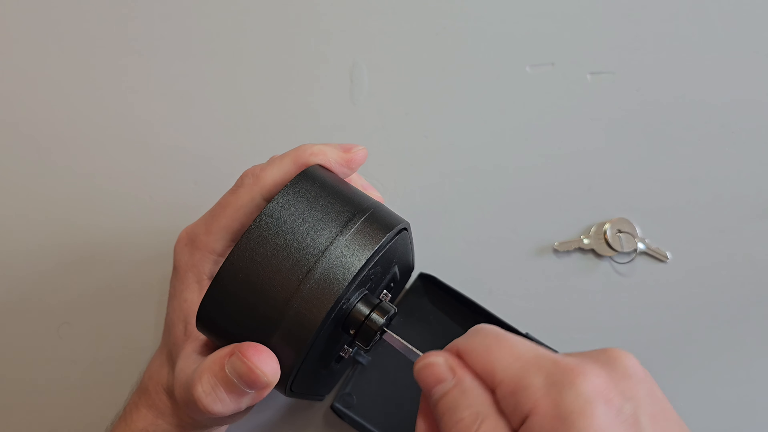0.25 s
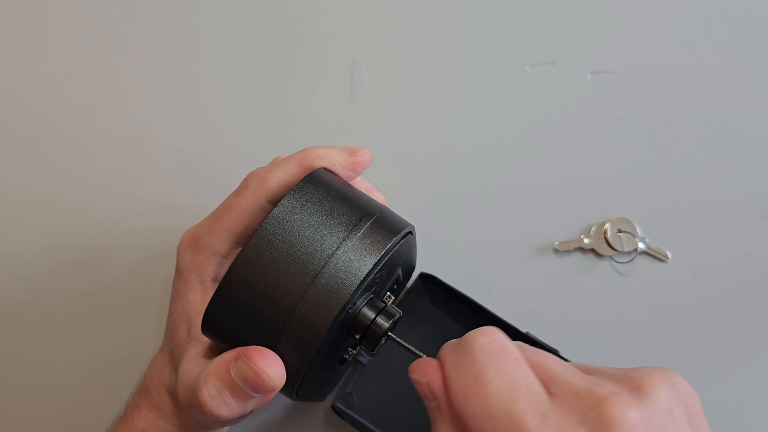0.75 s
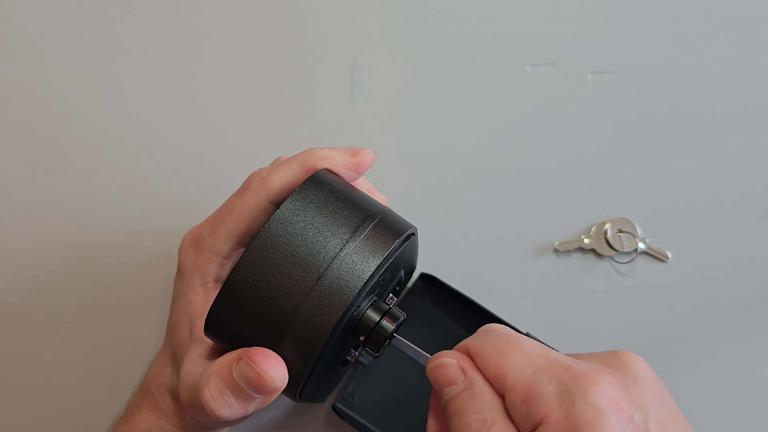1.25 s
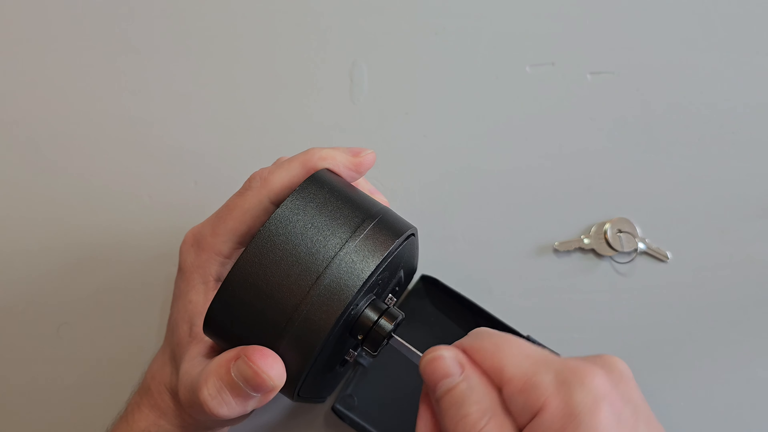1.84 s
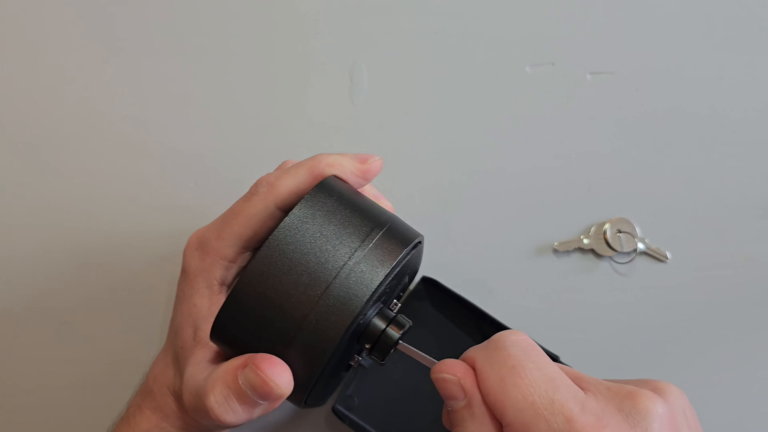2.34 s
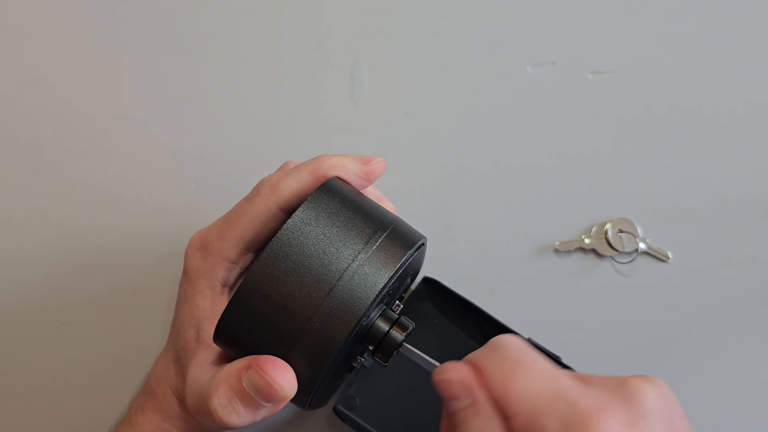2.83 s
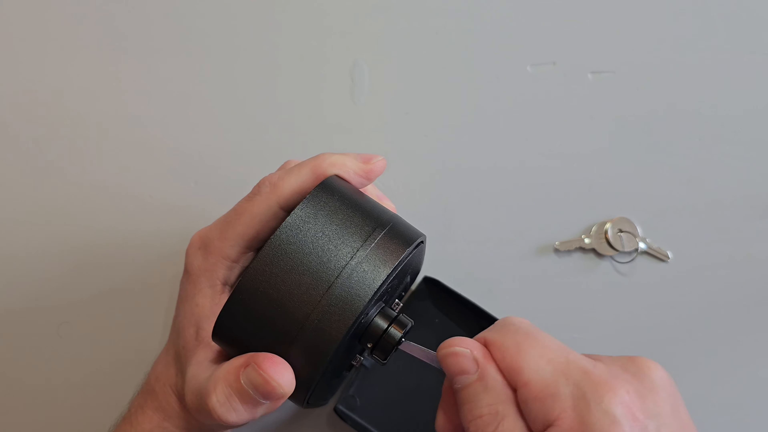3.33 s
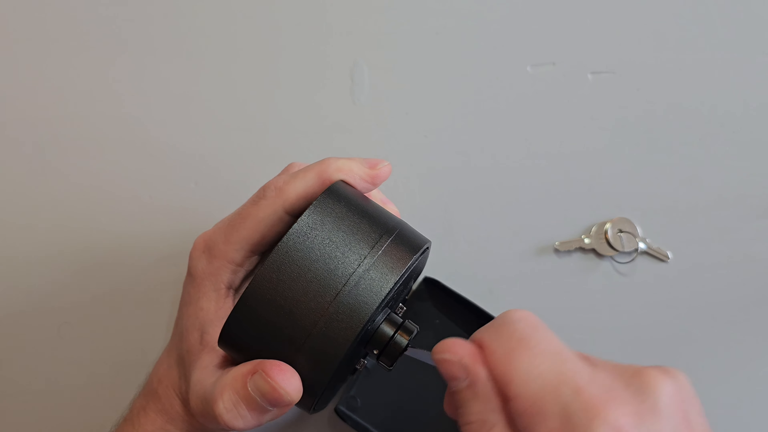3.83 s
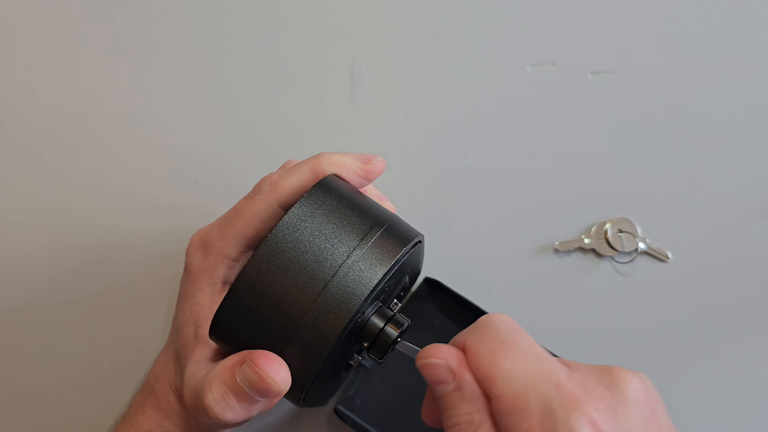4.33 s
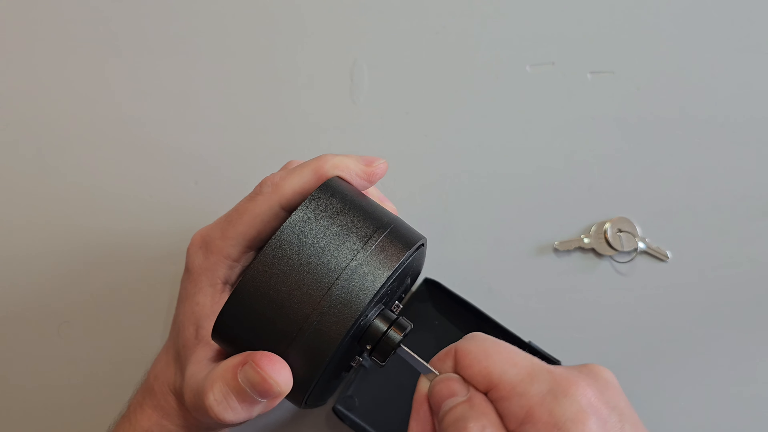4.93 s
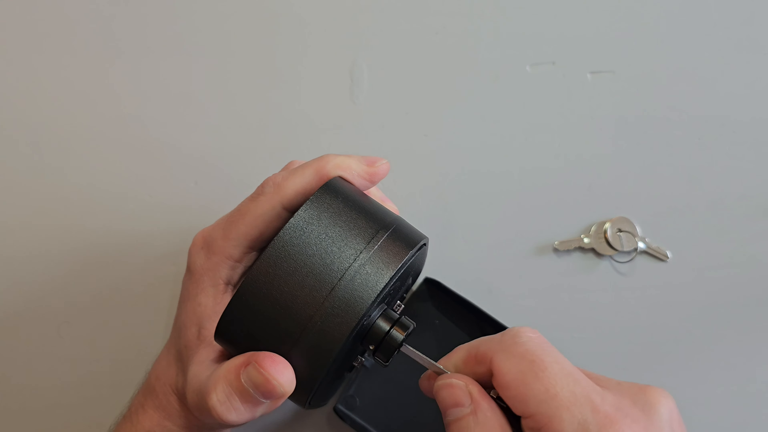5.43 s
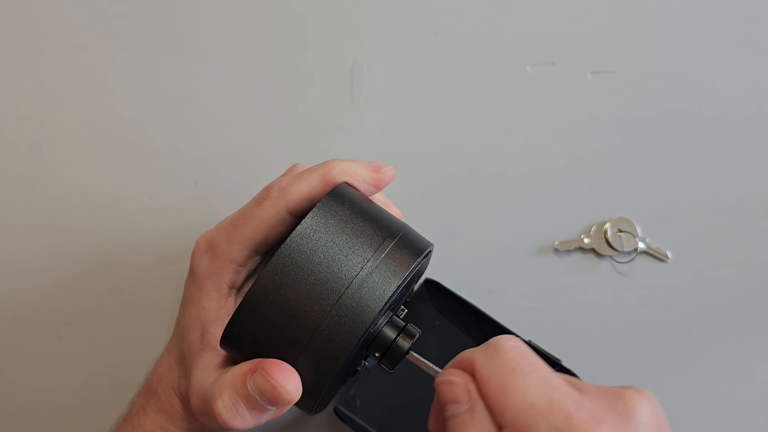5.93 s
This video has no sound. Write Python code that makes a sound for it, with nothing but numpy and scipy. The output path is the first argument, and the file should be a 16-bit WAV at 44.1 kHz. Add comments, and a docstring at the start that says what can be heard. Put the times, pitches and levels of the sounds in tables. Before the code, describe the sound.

A thin steel tool scrapes and clicks irregularly inside a small lock, with soft hollow thumps from the hand-held box and a faint room hum.

```python
"""Scrapes, sharp snaps and soft thumps: a thin steel jiggler works the lock of a small hand-held box.
The blade rubs in clumped ringing grains; each slip off a sprung wafer is a push plus stuttering noise.
Now and then the box knocks hollowly on its support, and filtered noise rumbles as the hand shifts.
Box and lock resonances colour it all; a small room adds a tail, booming low modes and a faint hum."""
import sys
import numpy as np
from scipy import signal
from scipy.fft import rfft, irfft
from scipy.io import wavfile

SR = 44100
rng = np.random.default_rng(int(sys.argv[2]) if len(sys.argv) > 2 else 0)


def transcribe(u):
    """Save the signal u as a 16-bit wav file named by the first command-line argument.

    u: samples, shape (n,) or (channels, n), limited to [-1, 1]; the rate is SR.
    q: integer samples, one column per channel.
    """
    v = np.clip(np.atleast_2d(u).T, -1, 1)
    q = np.round(v * 32767).astype(np.int16)
    wavfile.write(sys.argv[1], SR, q)


N = 272097

# blade slipping off a wafer, levels before the trims of each part: (time [s], click [dB],
# thump of the box [dB], bright tick [dB], length of the slip [s], pitch of the touched part [Hz])
WAFER_SLIPS = [(.0714, -96, -76, -53.5, 0.0038, 7800), (0.0956, -52, -76, -52, 0.0026, 2330),
               (0.1237, -48.5, -48.5, -57, .003, 2280), (0.1741, -56, -54, -51, 0.0071, 2370),
               (0.2131, -69, -49, -57, 0.0051, 2140), (.326, -62, -55.5, -102, 0.0019, 2320),
               (0.397, -47.5, -65, -45.5, 0.0045, 11600), (0.5033, -52, -55, -69, 0.0034, 2120),
               (0.5467, -44, -56, -46.5, .007, 9700), (0.5596, -60, -66, -46, .007, 9100),
               (.578, -60, -40, -54, 0.0048, 2390), (0.6, -64, -44, -47, 0.0064, 4100),
               (0.654, -37.5, -43.5, -31.5, 0.0026, 4270), (0.7339, -45, -42, -47.5, 0.0037, 2410),
               (0.7559, -53, -62, -45, 0.0055, 2170), (0.802, -64, -56, -46, 0.0034, 6840),
               (0.8444, -65, -47, -52, 0.0059, 2420), (.8938, -45, -71, -53, .005, 2860),
               (0.9227, -49.5, -54, -55, 0.0037, 2028), (0.9972, -44, -36, -92, 0.0084, 2350),
               (1.035, -76, -66, -51, 0.003, 11600), (1.1414, -59, -74, -49.5, 0.0038, 10800),
               (1.4595, -47, -56, -48.5, 0.0074, 2700), (1.4893, -63, -67, -52, 0.0011, 2380),
               (1.6363, -59.5, -48, -63.5, 0.0043, 2170), (1.7179, -48, -41, -44.5, 0.0068, 4360),
               (1.7418, -41, -41, -38.5, 0.0025, 1686), (1.821, -58, -50.5, -52.5, 0.0013, 6860),
               (1.961, -52, -48, -60, 0.0041, 2500), (2.0131, -60, -59, -45.5, 0.0045, 2300),
               (2.0238, -48.5, -45.5, -80, 0.005, 2250), (2.1695, -58.5, -49, -46.5, 0.0075, 2270),
               (2.1807, -44.5, -88, -78, .0035, 2340), (2.2523, -52, -56, -51.5, 0.0029, 2420),
               (2.349, -58, -67, -40.5, .0023, 3780), (2.3676, -42, -61, -48, 0.0027, 3760),
               (2.414, -43, -44, -68, 0.0089, 2360), (2.5147, -55, -54, -51, .01, 1740),
               (2.5241, -49, -38.5, -46.5, 0.004, 1600), (2.5486, -41.5, -38.5, -50, 0.0033, 2520),
               (2.6289, -47, -43, -38, .004, 9130), (2.6444, -49.5, -41, -64, 0.0034, 2430),
               (2.7076, -49, -46, -45, 0.0019, 2290), (2.7224, -39.5, -41, -54, 0.0025, 2380),
               (2.7764, -57, -57, -48.5, 0.0055, 12600), (2.8285, -48, -44, -62, 0.0044, 2860),
               (2.942, -55, -49.5, -56, 0.0055, 2440), (2.9725, -53, -43.5, -54, 0.0053, 2450),
               (3.0609, -46.5, -54.5, -43, .005, 9400), (3.1314, -64, -58, -60, 0.004, 8350),
               (3.2216, -49.5, -55, -54, 0.0035, 8900), (3.316, -55, -51, -62, 0.0035, 1620),
               (3.3305, -43.5, -93, -49, 0.0032, 2410), (3.3392, -38, -80, -47, 0.0033, 2640),
               (3.5786, -61.5, -61.5, -66.5, 0.0024, 2430), (3.6698, -70, -52.5, -82, 0.0021, 1640),
               (3.7314, -52.5, -56, -68, .003, 2200), (3.7855, -48, -59, -45, 0.0052, 2420),
               (3.8006, -51, -44.5, -44.5, 0.0016, 1960), (3.8404, -64, -48, -55, 0.00291, 2060),
               (3.8799, -44, -33.5, -38.5, .005, 1640), (3.9268, -40.5, -42.5, -66, 0.0017, 1640),
               (4.0161, -56, -43, -56, 0.0028, 2560), (4.0616, -44.5, -69, -55, 0.0029, 2850),
               (4.1256, -46, -45, -50.5, 0.0034, 2400), (4.2107, -47, -49, -52, 0.007, 2490),
               (4.262, -49, -53, -64, 0.0067, 2930), (4.3015, -39, -50, -44, 0.0036, 2600),
               (4.444, -47.5, -64, -67, 0.0018, 2450), (4.4725, -38.5, -49, -37, 0.0018, 6300),
               (4.564, -50, -39.5, -50, 0.0023, 2500), (4.61, -55, -54, -60, 0.0037, 7340),
               (4.655, -48, -47, -58, 0.0072, 2350), (4.6652, -37, -39.5, -32.5, 0.00305, 2510),
               (4.745, -45.5, -51.5, -54, 0.0046, 2230), (4.816, -55, -50, -69, 0.0016, 1740),
               (4.8737, -57, -67, -61, 0.0019, 1640), (4.9003, -60, -79, -53, .0013, 10800),
               (4.9817, -56, -56.5, -100, .0026, 2800), (5.2064, -42.5, -53.5, -86, 0.0022, 2500),
               (5.218, -73, -47, -49, 0.0015, 8200), (5.262, -55.5, -51.5, -76, 0.0032, 1700),
               (5.3405, -53, -55, -55, .002, 2200), (5.415, -49.5, -59, -72, 0.003, 2370),
               (5.4323, -49.5, -42, -57.5, .003, 4130), (5.4996, -67, -72, -46, 0.0029, 10900),
               (5.535, -50, -51, -56, 0.0076, 2412), (5.583, -62, -50, -49, 0.0083, 2500),
               (5.5927, -41.5, -42, -45, 0.0027, 2350), (5.6268, -52.5, -56, -34.5, 0.0013, 9800),
               (5.6513, -61, -68, -43, 0.0019, 11600), (5.7009, -42.5, -59, -40, 0.0044, 1620),
               (5.719, -50.5, -37, -53, .008, 2560), (5.847, -50, -48.5, -72, 0.0026, 3800),
               (5.9192, -56, -56, -59.5, 0.0026, 8200), (6.0167, -59, -44.5, -55.5, 0.0057, 2500),
               (6.0669, -46.5, -74, -54, 0.011, 2405), (6.0891, -48.5, -37, -53, .007, 2300)]
# strokes of the blade along the keyway, levels before trim:
# (start [s], end [s], scrape [dB], drag of the fingers on the shell [dB])
BLADE_STROKES = [(.05, 0.216, -56.5, -47.5), (0.369, 0.42, -60.5, -49.5), (0.556, 0.63, -50, -52),
                 (0.667, .9, -57, -48.5), (0.997, 1.14, -66, -58), (1.414, 1.514, -62, -52),
                 (1.721, 1.814, -62.5, -53), (1.93, 2.293, -63, -50), (2.36, 2.48, -52.5, -46),
                 (2.549, 2.915, -54, -46.5), (3.079, 3.192, -65.5, -57.5), (3.302, 3.476, -64, -50),
                 (3.768, 3.936, -63, -54.5), (4.023, 4.363, -62, -50.5), (4.45, 4.53, -60, -49),
                 (4.6, 4.838, -59, -47), (5.245, 5.26, -72, -53), (5.363, 5.446, -65.5, -48),
                 (5.573, 5.767, -52, -46.5), (5.802, 5.928, -68, -52), (5.994, 6.17, -65.5, -49.5)]
STROKE_ATTACK_S, STROKE_RELEASE_S = 0.034, 0.025


def wafer_clicks(shell_db, heavy_share):
    """The blade grates over a wafer and lets it snap; the shell sounds with it, more under a heavy thump."""
    # colour of the snaps: (frequency [Hz], level [dB])
    click_colour = [(60, -6.5), (130, -0.5), (220, 1.5), (320, -3), (430, 0), (580, -0.5), (850, -8),
                    (1150, -6.5), (1550, -2.5), (2000, -1.5), (3200, 0), (4400, -2.5), (5500, -3.5),
                    (7500, -0.5), (10500, -10), (13000, -1.5), (15500, -17)]
    ticks = faint_ticks(click_db=0.0, thump_db=1.5, tick_db=-5.5, spread_db=6.0, spread_octaves=0.47)
    rows = []
    for time, click, thump, tick, length_s, hz in WAFER_SLIPS + ticks:
        shell = click + shell_db + heavy_share * (thump - click)
        rows.append((time, thump, shell, click, tick, length_s, hz))
    snaps = contacts(rows, part_db=[20.75, 22.44, 20.4, 21.56], chatter=[.2, 1.0, 3.0, 4.0],
                     grain_db=3.5, apart=0.94, grate_db=-19.0, grate_s=0.0029, ring_db=9.0, ring_q=12.8)
    return colour(snaps, click_colour)


def faint_ticks(click_db, thump_db, tick_db, spread_db, spread_octaves):
    """Extra wafer slips at uneven times through each stroke; a harder stroke ticks louder."""
    ticks_per_s = 20
    centre_hz, centre_slip_s = 2600, 0.002615  # pitch and slip scatter around these
    rows = []
    for start, end, scrape_db, _ in BLADE_STROKES:
        lateness = rng.random(16)
        chances = np.clip(rng.standard_normal((16, 5)), -1.5, 1.5)
        for k, (late, chance) in enumerate(zip(lateness, chances)):
            time = start + (k + late) / ticks_per_s
            if time < min(end, N / SR):
                levels_db = scrape_db + np.array([click_db, thump_db, tick_db]) + spread_db * chance[:3]
                slip_s = centre_slip_s * 2 ** (chance[3] / 2)
                hz = centre_hz * 2 ** (spread_octaves * chance[4])
                rows.append((time, *levels_db, slip_s, hz))
    return rows


def contacts(table, part_db, chatter, grain_db, apart, grate_db, grate_s, ring_db, ring_q, size=4096):
    """Each contact grates, then lets go: a push plus dying tiny slips, strongest in the light parts."""
    # frequency ranges of thump, shell, lock and tick: (low [Hz], high [Hz])
    part_ranges = [(70, 260), (330, 1100), (1400, 4200), (5000, 18000)]
    lead = size // 4  # room for the grating ahead of the contact
    t = (np.arange(size) - lead) / SR
    force = np.zeros((len(part_ranges), 2, N + size))
    for time, *levels_db, length_s, hz in table:
        age = np.maximum(t, 0) / max(length_s / 2, 1e-4)
        grate = from_db(grate_db) * np.exp(-np.abs(t) / grate_s)
        stutter = np.sqrt(age) * np.exp(-age) + grate
        # small parts radiate a little differently towards each microphone
        slips = rng.standard_normal(size) + apart * rng.standard_normal((2, size))
        slips *= stutter * from_db(grain_db * rng.standard_normal(size))
        slips = rms_one(slips) / np.sqrt(size)
        push = np.arange(size) == lead + round(length_s * SR / 2)
        start = round(time * SR)
        for k, level_db in enumerate(levels_db):
            blow = (push + chatter[k] * slips) / np.hypot(1, chatter[k])
            ringing = resonate(blow, hz, hz / ring_q, ring_db)
            force[k, :, start:start + size] += from_db(level_db + part_db[k]) * ringing
    total = 0
    for k, (low, high) in enumerate(part_ranges):
        part = band(force[k, :, lead:lead + N], low, high) * np.sqrt(SR / (high - low))
        total = total + (-1) ** k * part  # neighbouring parts have opposite polarity
    return total


def rubbing(grains_per_s, grain_db, clump_db, clumps_per_s, apart, scrape_db, ring_db, ring_q, count=24):
    """Steel catches on brass in tiny clumped grains, ringing briefly at a pitch set by their spot."""
    # colour of the scrape: (frequency [Hz], level [dB])
    scrape_colour = [(100, -3), (250, -11), (500, 5.5), (700, 2), (1100, 3), (2000, 2.5), (4000, 0),
                     (8000, -7.5), (11000, -12.5), (16000, -10)]
    clump_clock = np.arange(N) / SR * clumps_per_s
    clumps = np.interp(clump_clock, np.arange(N), rng.standard_normal(N))
    sizes_db = grain_db * np.minimum(rng.exponential(1, N), 4) + clump_db * np.clip(clumps, -2, 2)
    catches = rng.random(N) < grains_per_s / SR
    kicks = rng.standard_normal(N) + apart * rng.standard_normal((2, N))
    grains = from_db(sizes_db) * catches * kicks
    # the grains of one clump come from the same spot and share its pitch
    spot = rng.integers(0, count, N)[clump_clock.astype(int)]
    grit = 0
    for k, hz in enumerate(np.geomspace(900, 10000, count)):
        grit = grit + resonate(grains * (spot == k) + 1e-18, hz, hz / ring_q, ring_db)
    rows = [(start, end, db + scrape_db) for start, end, db, _ in BLADE_STROKES]
    pressure = swells(rows, STROKE_ATTACK_S, STROKE_RELEASE_S)
    return rms_one(colour(grit, scrape_colour)) * pressure


def box_knocks():
    """The box bumps on its support: single clean blows on the hollow shell, with little stutter."""
    # bumps, levels before the trims of each part: (time [s], thump [dB], shell [dB], lock [dB],
    # tick [dB], length of the contact [s], pitch of the touched part [Hz])
    bumps = [(0.04, -44.5, -36.5, -52, -59, 0.0018, 500), (0.946, -40.5, -30.5, -41, -40, 0.0017, 419),
             (1.258, -49, -40.5, -54, -92, 0.0013, 450), (1.385, -51.5, -39, -51.5, -76, 0.0013, 460),
             (1.5066, -33, -52, -38, -74, 0.00196, 980), (1.7631, -35.5, -51, -52, -41, 0.0041, 453),
             (2.391, -34.5, -30.5, -35, -39, 0.00156, 474.4), (5.059, -39, -53.5, -42, -54, 0.0014, 460)]
    # colour of the bumps: (frequency [Hz], level [dB])
    knock_colour = [(60, -12.5), (200, -5.5), (450, 0), (780, 1), (1050, 1), (1300, -5), (2000, -2),
                    (3200, -0.5), (5000, -8.5), (8000, -9), (16000, -36)]
    blows = contacts(bumps, part_db=[23.8, 19.2, 21.5, 21.9], chatter=[.1, .3, .8, 1.2],
                     grain_db=-1.5, apart=0.26, grate_db=-10, grate_s=0.0026, ring_db=8.0, ring_q=12)
    return colour(blows, knock_colour)


def pings():
    """Parts of lock and shell ring or squeak briefly as decaying sine tones."""
    # tones: (time [s], frequency [Hz], level [dB], time to fall by 60 dB [s])
    tones = [(0.998, 2390, -29.5, 0.021), (1.507, 136, -54, 0.097), (3.223, 222, -45, 0.16),
             (3.331, 1930, -39.5, 0.096), (3.885, 471, -32, 0.026), (5.060, 690, -42, 0.13),
             (5.208, 211.6, -39.5, 0.2), (5.712, 470, -28, 0.048)]
    out = np.zeros(N)
    for time, hz, level_db, t60 in tones:
        t = np.arange(N - round(time * SR)) / SR
        decay = from_db(level_db - np.minimum(60 * t / t60, 200))
        out[-len(t):] += decay * np.sin(2 * np.pi * hz * t)
    return out


def handling(shove_db, hold_db, drag_db, give_db):
    """The box rumbles as it shifts in the hand; fingers drag on its shell and give under each thump."""
    # the box shifts in the hand: (time [s], rumble before trim [dB])
    shoves = [(.17, -58), (1.75, -43), (2.18, -60), (2.39, -40), (2.73, -45), (3.13, -69), (3.42, -53),
              (3.79, -51), (3.89, -46), (4.33, -48.5), (4.7, -50), (5.07, -55), (5.63, -42), (6.09, -50)]
    # unsteadiness of the holding hand: (time [s], rumble before trim [dB])
    hold = [(0.0, -65), (0.95, -78), (1.24, -77), (2.82, -60), (3.63, -68), (3.99, -65), (6.17, -63.5)]
    # colour of the rumble: (frequency [Hz], level [dB])
    rumble_colour = [(20, -1), (35, 3.5), (50, 1.5), (68, 5.5), (95, 1), (140, -1.5), (250, -41),
                     (1000, -49)]
    # drone of the shell under dragging fingers: (frequency [Hz], level [dB])
    grip_colour = [(60, -25), (100, -9.5), (130, -3.5), (175, 1), (225, -0.5), (300, -6.5), (450, -8),
                   (600, -11.5), (900, -25.5), (2000, -51)]
    shift_rows = [(time, time, db + shove_db) for time, db in shoves]
    shifts = swells(shift_rows, attack_s=0.025, release_s=0.033)
    unsteadiness = from_db(along(hold) + hold_db)
    rumble = rms_one(colour(rng.standard_normal(N), rumble_colour)) * np.hypot(shifts, unsteadiness)
    drag_rows = [(start, end, db + drag_db) for start, end, _, db in BLADE_STROKES]
    drag = swells(drag_rows, STROKE_ATTACK_S, STROKE_RELEASE_S)
    give_rows = [(time, time, thump + give_db) for time, _, thump, *_ in WAFER_SLIPS]
    give = swells(give_rows, attack_s=.01, release_s=0.037)
    drone = rms_one(colour(rng.standard_normal(N), grip_colour)) * np.hypot(drag, give)
    return rumble + drone


def body(x):
    """The resonances of box and lock colour every contact."""
    # resonances; a negative lift is a dip: (frequency [Hz], width [Hz], lift [dB])
    resonances = [(215.8, 21.2, 8.5), (297, 300, -3.5), (500, 86, 6), (580.3, 9.7, 3.5), (710, 35, -0.5),
                  (794, 92, 4.5), (1107, 79, 7.5), (1140, 100, -8.5), (1411, 120, 7), (1640, 70, 6),
                  (1960, 43, 7), (2350, 270, 5.5), (2644, 236, -17), (3300, 180, -0.5), (3900, 360, 0.5),
                  (4270, 180, 3.5), (5530, 250, 4), (7300, 300, 4.5), (8880, 770, 3.5), (11370, 470, 8),
                  (14700, 510, 6.5)]
    for hz, width_hz, lift_db in resonances:
        x = resonate(x, hz, width_hz, lift_db)
    return x


def room(x, build_s, alike_hz, size=26000):
    """Direct sound, earlier at the left; a tail shaped by band, alike in the bass; standing waves."""
    # reverberation; a negative time makes the band swell until the tail is cut:
    # (frequency [Hz], time to fall by 60 dB [s])
    tail_t60 = [(100, -0.8), (260, 0.36), (700, 0.18), (2000, 0.37), (5000, 0.07), (14000, 0.31)]
    # level of the tail: (frequency [Hz], level [dB])
    tail_db = [(100, -21.5), (300, -3.5), (550, -6), (850, -4), (1200, -5), (2000, -4), (5000, -5),
               (8500, -9), (12000, 3), (16000, -27)]
    # standing waves: (frequency [Hz], level [dB], time to fall by 60 dB [s])
    standing_waves = [(60.5, -80, 0.39), (128.1, -54, 0.35), (158.6, -53.5, 0.23), (222, -57.5, 0.26),
                      (358.8, -55, .3), (470, -56.5, 0.13), (519.3, -61, 0.12), (586, -61.5, 0.28),
                      (656.6, -63.5, 0.28), (821.5, -62.5, 0.46)]
    left_lag_s = -0.00012
    t = np.arange(size) / SR
    edges = np.geomspace(60, 17000, 15)
    response = np.zeros((2, size))
    for low, high in zip(edges, edges[1:]):
        hz = np.sqrt(low * high)
        alike = 1 / (1 + (hz / alike_hz) ** 2)
        mid, side = band(rng.standard_normal((2, size)), low, high)
        tail = np.sqrt(1 + alike) * mid + np.sqrt(1 - alike) * side * [[1], [-1]]
        tail *= from_db(-60 * t / at_hz(tail_t60, hz)) * (1 - np.exp(-(t / build_s) ** 2))
        # even out the energy of the bands before their levels apply
        even = np.sqrt(4 * (high - low) / SR / np.sum(tail ** 2))
        response += tail * from_db(at_hz(tail_db, hz)) * even
    for hz, level_db, t60 in standing_waves:
        response += from_db(level_db - 60 * t / t60) * np.cos(2 * np.pi * hz * t)
    # a phase slope moves the left channel about 5 samples earlier
    shift = np.exp(-2j * np.pi * np.fft.rfftfreq(2 * N, 1 / SR) * left_lag_s)
    left = irfft(rfft(x[0], 2 * N) * shift)[:N]
    return np.array([left, x[1]]) + signal.fftconvolve(response, x, axes=1)[:, :N]


def hum(level_db, apart):
    """Low steady room noise, mostly shared by both microphones."""
    # colour of the hum: (frequency [Hz], level [dB])
    hum_colour = [(20, -3), (40, 4), (130, -11.5), (230, 2), (330, -11), (550, -6), (1000, -12),
                  (2200, -34), (4000, -24.5), (10000, -39), (16000, -33)]
    mid, side = [rms_one(colour(rng.standard_normal(N), hum_colour)) for _ in range(2)]
    return from_db(level_db) * (mid + apart * side * np.array([[1], [-1]]))


def resonate(x, hz, width_hz, lift_db):
    """A resonance lifts its own narrow range and rings on; a negative lift dips it."""
    b, a = signal.iirpeak(hz, hz / width_hz, fs=SR)
    return x + (from_db(lift_db) - 1) * signal.lfilter(b, a, x)


def swell(start, end, attack_s, release_s):
    """Envelope, every 32 samples, that rises up to start, holds until end and dies away."""
    t = np.arange(0, N, 32) / SR
    return np.exp(-np.maximum(start - t, 0) / attack_s - np.maximum(t - end, 0) / release_s)


def swells(rows, attack_s, release_s):
    """Joint gain, at every sample, of rows (start [s], end [s], level [dB]), summed as power."""
    power = sum((from_db(db) * swell(start, end, attack_s, release_s)) ** 2 for start, end, db in rows)
    return np.interp(np.linspace(0, len(power) - 1, N), np.arange(len(power)), np.sqrt(power))


def along(curve):
    """Read a curve over time at every sample."""
    return np.interp(np.arange(N) / SR, *np.transpose(curve))


def colour(x, spectrum, size=8192):
    """Causal (minimum-phase) filter that follows a spectrum."""
    levels_db = at_hz(spectrum, np.fft.rfftfreq(size, 1 / SR))
    cepstrum = irfft(np.log(from_db(levels_db)))
    # folding the cepstrum forward gives minimum phase
    cepstrum[1:size // 2] *= 2
    cepstrum[size // 2 + 1:] = 0
    impulse = irfft(np.exp(rfft(cepstrum)))
    return signal.fftconvolve(np.atleast_2d(x), impulse[None], axes=1)[:, :N]


def band(x, low, high):
    """Causal band-pass."""
    return signal.sosfilt(signal.butter(2, [low, high], "band", fs=SR, output="sos"), x + 1e-18)


def at_hz(points, hz):
    """Read a table on a log-frequency axis."""
    points = np.array(points)
    return np.interp(np.log(np.maximum(hz, 1)), np.log(points[:, 0]), points[:, 1])


def rms_one(x):
    """Scale to rms 1."""
    return x / np.sqrt(np.mean(x ** 2) + 1e-20)


def from_db(db):
    """Decibels to gain."""
    return 10 ** (np.asarray(db) / 20)


def scene():
    """All contacts sound through the box into the room; the whole picture leans a little to the left."""
    left_db = 3.5  # level of left over right
    scrape = rubbing(grains_per_s=1600, grain_db=1.0, clump_db=7.5, clumps_per_s=200, apart=1.0,
                     scrape_db=-2.5, ring_db=19.5, ring_q=9.7)
    hands = handling(shove_db=-1.5, hold_db=1.0, drag_db=-9, give_db=-13)
    force = scrape + hands + box_knocks() + wafer_clicks(shell_db=-1.5, heavy_share=0.18)
    box = body(force) + pings()
    sound = room(box, build_s=0.002, alike_hz=795) + hum(level_db=-70, apart=0.61)
    return sound * from_db(np.array([[left_db], [-left_db]]) / 2)


def record(dry):
    """The top is cut steeply by an elliptic low-pass."""
    cutoff_hz = 16500
    return signal.sosfilt(signal.ellip(10, .2, 70, cutoff_hz, fs=SR, output="sos"), dry)


dry = scene()
out = record(dry)
transcribe(out)
```